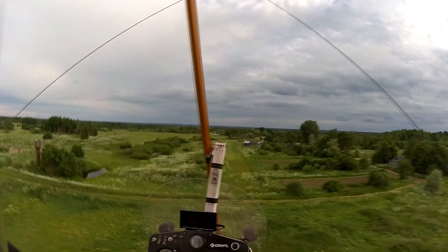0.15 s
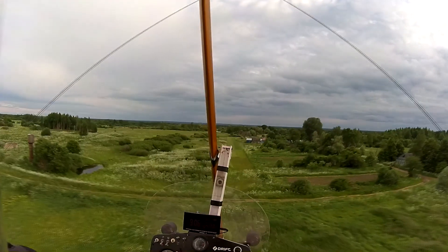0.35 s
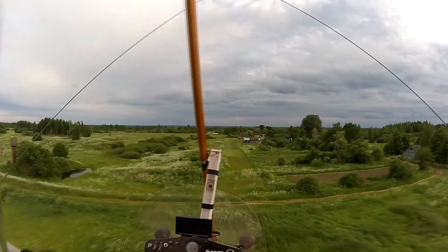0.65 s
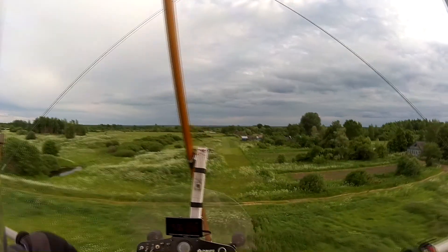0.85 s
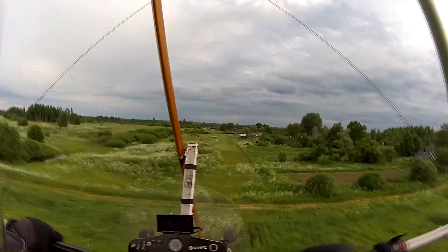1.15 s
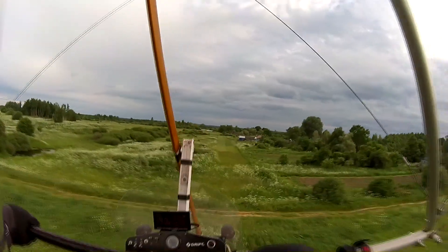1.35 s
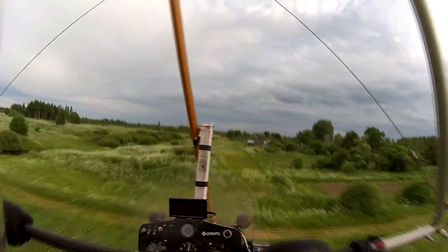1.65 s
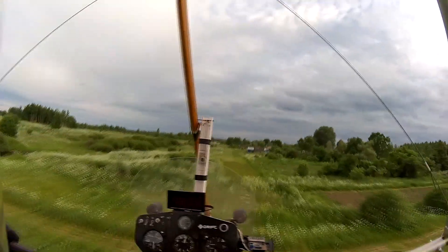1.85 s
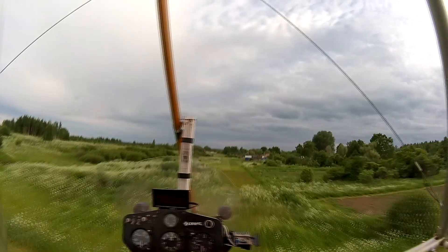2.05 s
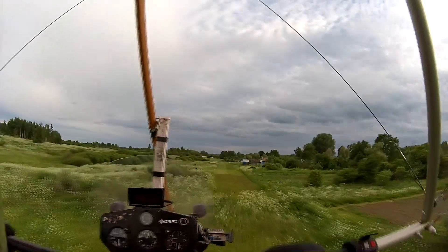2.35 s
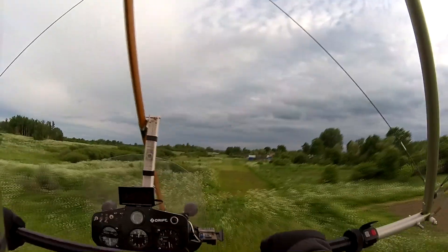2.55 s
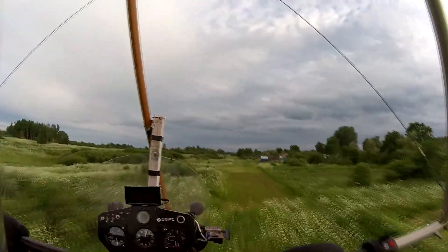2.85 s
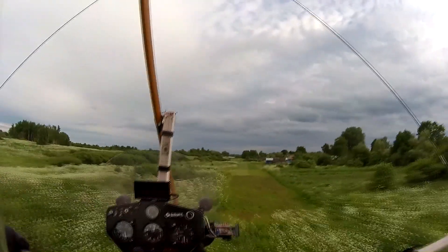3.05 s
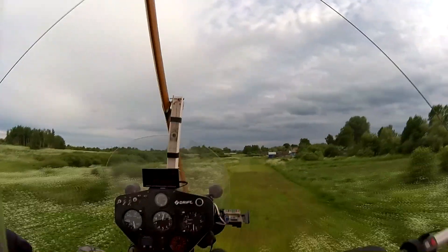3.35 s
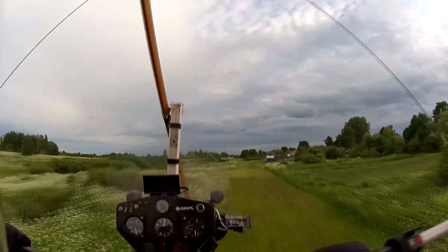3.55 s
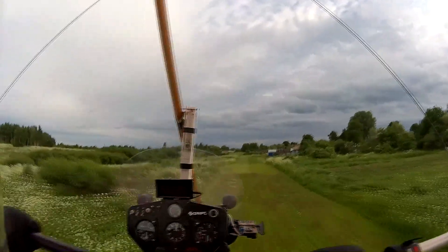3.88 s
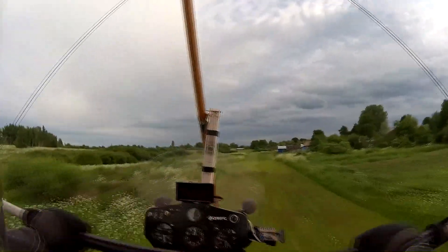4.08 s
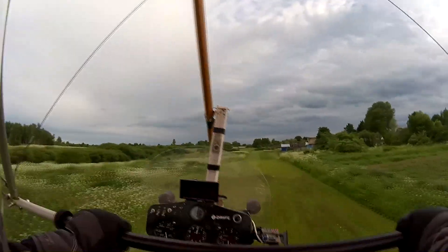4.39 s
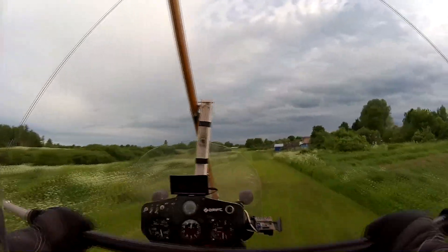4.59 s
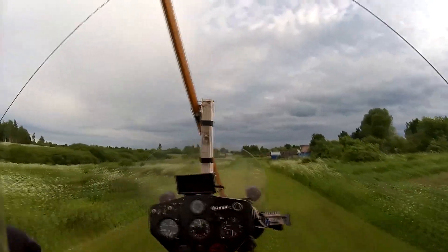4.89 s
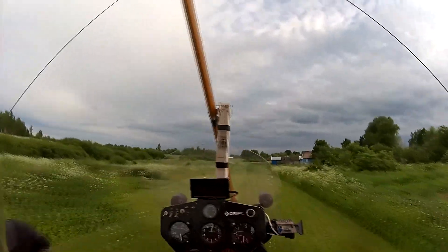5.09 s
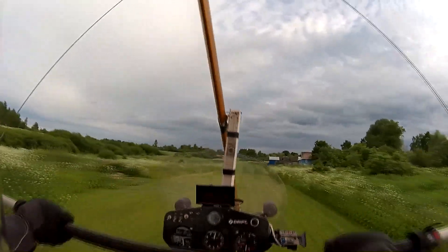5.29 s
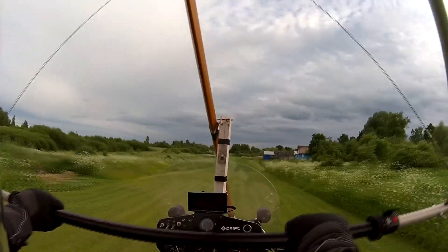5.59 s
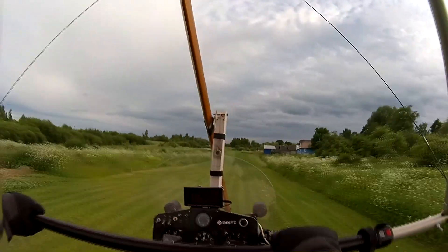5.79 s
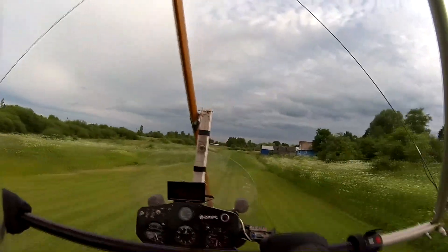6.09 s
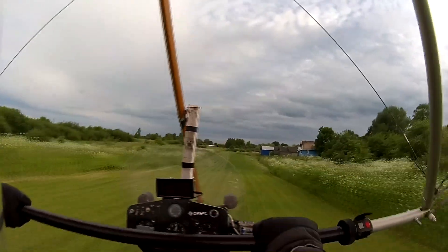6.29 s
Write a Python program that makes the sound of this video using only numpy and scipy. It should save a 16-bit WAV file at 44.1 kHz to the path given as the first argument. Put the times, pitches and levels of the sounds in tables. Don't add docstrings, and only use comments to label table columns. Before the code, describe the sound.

On a powered hang-glider sinking toward a grass strip, wind roars straight into a microphone. Low thumps and sharp jabs mix with airy hiss, while two thin rigging whistles waver underneath. The strongest gust, just before two seconds, makes the microphone click and rattle. A tiny buckle tick comes near three seconds; the wind slackens after four, then new gusts hit from five.

```python
import sys
import numpy as np
from scipy import signal
from scipy.fft import rfft, irfft, next_fast_len
from scipy.io import wavfile
from scipy.ndimage import uniform_filter1d, map_coordinates

SR = 44100
rng = np.random.default_rng(int(sys.argv[2]) if len(sys.argv) > 2 else 0)


def volts_from_db(level):
    exponent = np.asarray(level, float) / 20
    return 10 ** exponent


def to_wav(s):
    ch = np.atleast_2d(s).T
    pcm = np.round(np.clip(ch, -1, 1) * 32767)
    wavfile.write(sys.argv[1], SR, pcm.astype(np.int16))


N = 283563


def unit(x):
    return x / np.sqrt(np.mean(x ** 2) + 1e-20)


def curves(rows):
    start_s, *columns = np.transpose(rows)
    return [np.interp(np.arange(N) / SR, start_s, column) for column in columns]


def wobble(rate_hz):
    knots = rng.standard_normal(int(N * 400 / SR) + 8)
    return map_coordinates(knots, [np.arange(N) * rate_hz / SR])


def rush(spectrum, patchy_db):
    cells = signal.stft(rng.standard_normal(N + 1024), nperseg=512)[2]
    patches = uniform_filter1d(rng.standard_normal(cells.shape), size=5, axis=0)
    patches = uniform_filter1d(patches, size=8, axis=1)
    noise = signal.istft(cells * volts_from_db(patchy_db * unit(patches)), nperseg=512)[1]
    size = next_fast_len(N + 8192)
    pitch_hz, level_db = np.transpose(spectrum)
    bin_hz = np.fft.rfftfreq(size, 1 / SR)
    colour_db = np.interp(np.log(bin_hz + 1), np.log(pitch_hz + 1), level_db)
    return unit(irfft(rfft(noise, size) * volts_from_db(colour_db), size)[:N])


# pitch_hz [Hz], level_db [dB]
WHINE_LINES = [(9525, -92), (9575, -91), (9625, -77), (9675, -91), (9725, -93)]
# pitch_hz [Hz], level_db [dB per Hz]
SELF_NOISE_SPECTRUM = [(2000, -120), (4000, -11.5), (8000, 2), (11000, -3), (13000, -13.5), (15300, -20.5),
                       (15800, -120)]


def camera():
    t = np.arange(N) / SR
    whine = np.zeros(N)
    for pitch_hz, level_db in WHINE_LINES:
        whine += volts_from_db(level_db) * np.sqrt(2) * np.sin(2 * np.pi * (pitch_hz * t + rng.random()))
    return whine + volts_from_db(-77) * rush(SELF_NOISE_SPECTRUM, patchy_db=4.5)


# start_s [s], pitch_hz [Hz], level_db [dB], t60_s [s]
BUCKLE_TICKS = [
    (1.826, 6600, -50, .05),
    (1.955, 6600, -49, .06),
    (3.0575, 5200, -38, .003),
    (3.0716, 5500, -28, .003),
    (3.0718, 10500, -38, .002),
]


def buckle():
    ticks = np.zeros(N)
    for start_s, pitch_hz, level_db, t60_s in BUCKLE_TICKS:
        since = np.clip(np.arange(N) / SR - start_s, 0, None)
        ticks += volts_from_db(level_db - 60 * since / t60_s) * np.sin(2 * np.pi * pitch_hz * since)
    return ticks


def vortex_whistle(rows, wander, steady):
    pitch_hz, level_db = curves(rows)
    phase = 2 * np.pi * np.cumsum(pitch_hz * (1 + wander * wobble(25))) / SR
    shedding = steady + wobble(115) + 1j * wobble(115)
    return volts_from_db(level_db + 0.8) * unit(np.imag(shedding * np.exp(1j * phase)))


# start_s [s], pitch_hz [Hz], level_db [dB]
THIN_WIRE_WHISTLE = [(0, 1470, -46), (.5, 1470, -45), (.82, 1555, -46), (1.12, 1525, -45),
                     (1.28, 1615, -45.5), (1.8, 1620, -43), (2.4, 1610, -42), (3, 1545, -43),
                     (3.2, 1510, -47), (3.33, 1495, -42), (3.44, 1510, -47), (3.54, 1540, -43),
                     (3.75, 1495, -48), (4.9, 1410, -52), (4.98, 1395, -42), (5.25, 1405, -42),
                     (5.33, 1380, -50), (6.43, 1340, -50)]
# start_s [s], pitch_hz [Hz], level_db [dB]
THICK_WIRE_WHISTLE = [(0, 950, -42), (.38, 975, -37), (.68, 960, -37), (.8, 950, -44), (1.05, 930, -50),
                      (1.2, 950, -43), (1.4, 960, -47), (2.2, 980, -45), (6.43, 870, -51)]


def wires():
    thin = vortex_whistle(THIN_WIRE_WHISTLE, wander=0.011, steady=1.2)
    thick = vortex_whistle(THICK_WIRE_WHISTLE, wander=0.008, steady=0.5)
    return thin + thick


# [dB, peak within 9 to 15 kHz]
OVERLOAD_CLICKS = [(0.1659, -46.6), (0.2729, -50.4), (0.2909, -56), (0.9787, -48.5), (1.6627, -47.6),
                   (1.7897, -45.8), (1.7947, -48.4), (1.7968, -44.5), (1.8782, -44.6), (1.8858, -43.8),
                   (1.901, -50.7), (1.9492, -47.7), (1.955, -46.2), (1.976, -47), (1.9999, -48.6),
                   (2.0198, -47.7), (2.1016, -48.7), (2.1565, -51), (2.2457, -52.7), (2.9617, -44.1),
                   (2.9647, -48), (2.9753, -49.4), (3.0001, -46.7), (3.0724, -46.1), (3.1624, -52),
                   (3.41, -51.6), (5.098, -47), (5.2072, -54.2), (5.2616, -50.6), (5.5287, -47)]


def overload():
    t = np.arange(SR // 100) / SR
    swing = t * SR * np.exp(-t / 0.00046) + 0.35 * (t > 0) * np.exp(-t / 0.0003)
    # nine clicks, 6.2 ms apart
    chatter = [(1.8122 + k * 0.0062, -48 + 3 * rng.standard_normal()) for k in range(9)]
    kicks = np.zeros(N)
    for start_s, level_db in OVERLOAD_CLICKS + chatter:
        kicks[round(start_s * SR)] = rng.choice([-1, 1]) * volts_from_db(level_db + 19.5)
    port = signal.butter(3, 13500, fs=SR, output="sos")
    return signal.sosfilt(port, signal.fftconvolve(kicks, swing)[:N])


def swell(t, length_s):
    u = 3.6 * np.clip(t / length_s, 0, 30)
    return u * np.exp(1 - u)


# start_s [s], level_db [dB, peak], pitch_hz [Hz]
EDDY_THUDS = [(-0.004, -6, 60), (0.115, -9.5, 145), (0.194, -10, 131), (0.257, -3.5, 70), (0.312, -7, 123),
              (1.56, -8, 145), (1.619, -7.5, 342), (1.682, -11, 90), (1.766, -14, 115), (1.781, -1, 105),
              (2.086, -3.5, 127), (2.24, -10, 99.6), (2.281, -5.5, 142), (2.456, -11, 222),
              (2.618, -4, 215), (2.806, -5, 116), (2.859, -3.5, 139), (2.922, -9, 167), (3.381, -12, 144),
              (3.434, -5, 90), (3.51, -12, 118), (4.601, -9, 70), (5.04, -4.5, 65), (5.092, -5, 100),
              (5.186, -9, 194), (5.239, -3.5, 156), (5.3, -9, 153), (5.45, -3.5, 110), (5.868, -3.5, 210),
              (6.006, -5.5, 158)]


def thuds():
    t = np.arange(N) / SR
    shoves = np.zeros(N)
    for start_s, level_db, pitch_hz in EDDY_THUDS:
        since = t - start_s
        shoves += volts_from_db(level_db - 6.5) * swell(since, length_s=0.025) * np.sin(2 * np.pi * pitch_hz * since)
    return shoves


# start_s [s], level_db [dB]
EDGE_SPURTS = [(0.16, -35.5), (0.196, -41), (0.314, -40), (0.976, -41), (1.36, -40), (1.63, -34),
               (1.774, -28.5), (1.816, -28.5), (1.852, -40), (1.955, -37), (2.055, -36.5), (2.108, -37.5),
               (2.249, -38), (2.424, -43), (2.513, -44), (2.626, -36.5), (2.732, -31.5), (2.85, -36),
               (3.074, -39), (3.249, -48), (3.57, -38), (4.628, -38.5), (5.059, -36), (5.253, -36),
               (5.459, -35), (5.499, -37), (5.684, -41), (5.716, -39.5), (5.886, -36.5), (6.014, -36.5)]
# pitch_hz [Hz], level_db [dB per Hz]
EDGE_SPECTRUM = [(700, -120), (1000, 9), (2200, 0), (5000, -20.5), (10000, -36.5), (15000, -51.5),
                 (15800, -120)]


def fizz():
    t = np.arange(N) / SR
    half_length_s = 0.009
    spurts = np.zeros(N)
    for start_s, level_db in EDGE_SPURTS:
        spurts += volts_from_db(level_db + 2.5 - 19 * ((t - start_s) / half_length_s) ** 2)
    return spurts * rush(EDGE_SPECTRUM, patchy_db=0.5)


def strays():
    count = 70
    start_s = 0.05 + (N / SR - 0.1) * rng.random(count)
    size, pitch = rng.standard_normal((count, 2)).T
    airstream_db = curves(AIRSTREAM)[0][(start_s * SR).astype(int)]
    level_db = airstream_db + 9 + 2 * size
    pitch_hz = 360 * np.exp(0.3 * np.tanh(pitch))
    return list(zip(start_s, level_db, pitch_hz))


# start_s [s], level_db [dB, peak], pitch_hz [Hz]
EDDY_JABS = [(0.1579, -6, 535), (0.1924, -8.5, 470), (0.9672, -10.5, 238), (1.6304, -3.5, 360),
             (1.651, -5, 310), (1.7747, 1.5, 275), (1.8148, -3.5, 242), (1.8783, -4, 260),
             (1.914, -2.5, 300), (1.9548, -1.5, 400), (2.0547, -8.5, 570), (2.1612, -6, 250),
             (2.296, -9, 350), (2.465, -8.5, 408), (2.5097, -9, 556), (2.5341, -4.5, 448),
             (2.6263, -7.5, 248), (2.7331, -7.5, 646), (2.9621, -11, 467), (2.9842, -5, 530),
             (3.2444, -4, 464), (3.6116, -10.5, 456), (4.7634, -9.5, 570), (5.004, -7.5, 266),
             (5.1399, -4, 278), (5.2548, -6.5, 240), (5.5252, -5, 219), (5.6824, -14, 526),
             (5.887, -2.5, 384), (6.012, -9.5, 353)]


def jabs():
    t = np.arange(N) / SR
    swing = np.zeros(N)
    for start_s, level_db, pitch_hz in EDDY_JABS + strays():
        sign = -1 if rng.random() < 0.75 else 1
        near = slice(round((start_s - 0.02) * SR), round((start_s + 0.02) * SR))
        cycles = pitch_hz * (t[near] - start_s)
        envelope = volts_from_db(level_db - 1.5 - 24 * cycles ** 2)
        swing[near] += sign * envelope * np.cos(2.4 * np.pi * cycles)
    return swing


# start_s [s], level_db [dB], excess_db of large eddies [dB]
AIRSTREAM = [(0, -24, -1.5), (0.2, -23, 8.5), (0.5, -27.5, 2.5), (0.8, -26.5, 2), (1.3, -27, -3.5),
             (1.55, -25.5, 4.5), (1.78, -16, 4), (2.2, -22.5, 3), (2.38, -22.5, -3.5), (2.65, -20.5, -1.5),
             (2.9, -19.5, 1.5), (3.9, -22.5, 1), (4.35, -28.5, -3), (4.65, -23.5, -6), (4.9, -25, -3.5),
             (5.12, -23.5, 4.5), (5.9, -23, 2.5), (6.43, -27, 3.5)]
# pitch_hz [Hz], level_db [dB per Hz]
BUFFET_SPECTRUM = [(11, -46.5), (18, -2), (59, 2.5), (112, 1.5), (151, -2), (188, -3), (400, -10),
                   (520, -21), (880, -120)]
# pitch_hz [Hz], level_db [dB per Hz]
ROAR_SPECTRUM = [(71, -29), (120, -1), (248, -3.5), (381, -4), (573, -4), (976, -13), (1210, -19.5),
                 (1540, -24), (1750, -42.5), (2500, -48), (3250, -59.5), (5500, -120)]
# pitch_hz [Hz], level_db [dB per Hz]
HISS_SPECTRUM = [(700, -120), (900, 0), (1300, -6.5), (2000, -7), (3200, -16.5), (5000, -28), (8000, -37),
                 (12000, -48.5), (15000, -73), (15800, -120)]


def wind():
    level_db, excess_db = curves(AIRSTREAM)
    flutter = wobble(38) + 0.64 * wobble(19)
    ripple = wobble(130)
    buffet_db = 0.56 * flutter + 0.2 * wobble(15) + 1.5 * wobble(9)
    buffet = unit(volts_from_db(buffet_db) * rush(BUFFET_SPECTRUM, patchy_db=1.2))
    roar_db = 0.64 * flutter + 1.6 * ripple + 0.96 * wobble(12)
    roar = unit(volts_from_db(roar_db) * rush(ROAR_SPECTRUM, patchy_db=0.6))
    hiss = unit(volts_from_db(0.47 * flutter + 1.3 * ripple) * rush(HISS_SPECTRUM, patchy_db=-0.1))
    dull = signal.sosfiltfilt(signal.butter(2, 450, fs=SR, output="sos"), roar)
    roar = dull + volts_from_db(-0.27 * excess_db) * (roar - dull)
    hiss_db = -42 + 0.97 * (level_db - level_db.mean()) + 0.09 * excess_db
    return volts_from_db(level_db + excess_db) * buffet + volts_from_db(level_db) * roar + volts_from_db(hiss_db) * hiss


def scene():
    background = camera() + buckle() + wires()
    diaphragm = overload() + thuds()
    airflow = fizz() + jabs() + wind()
    return (background + diaphragm + airflow)[None]


def roll_off(x):
    return signal.sosfilt(signal.butter(12, 15800, fs=SR, output="sos"), x)


def record(dry):
    lopsided = dry - 0.08 * dry ** 2
    low_cut = signal.butter(2, 14, "high", fs=SR, output="sos")
    cut = signal.sosfilt(low_cut, lopsided)
    soft = cut / (1 + np.abs(cut) ** 6) ** (1 / 6)
    return roll_off(soft)


dry = scene()
out = record(dry)
to_wav(out)
```